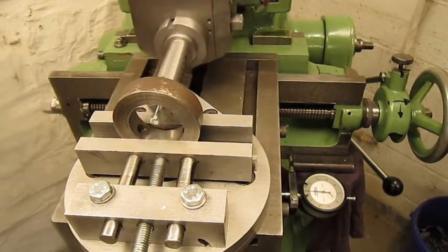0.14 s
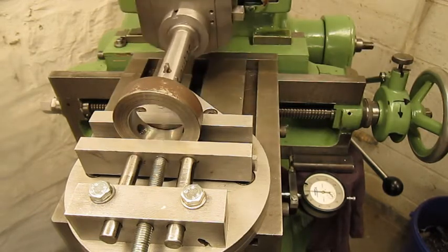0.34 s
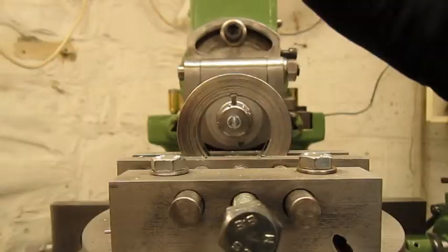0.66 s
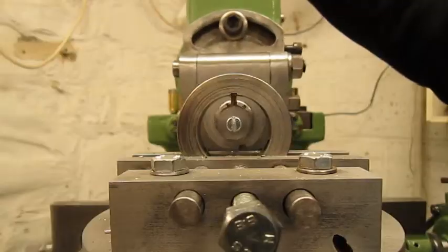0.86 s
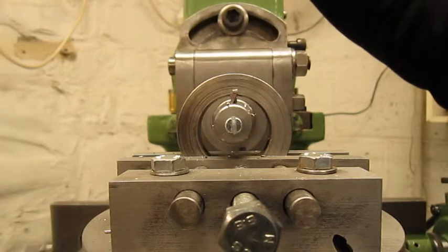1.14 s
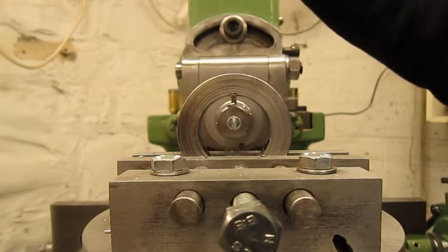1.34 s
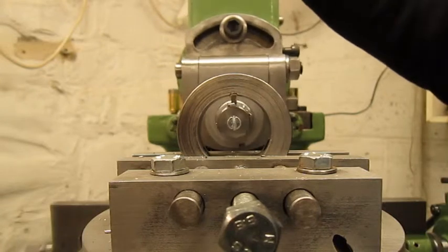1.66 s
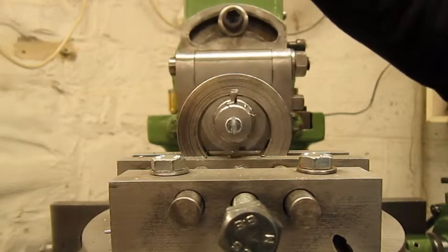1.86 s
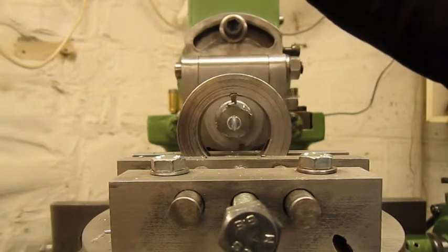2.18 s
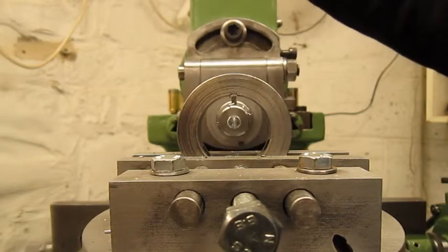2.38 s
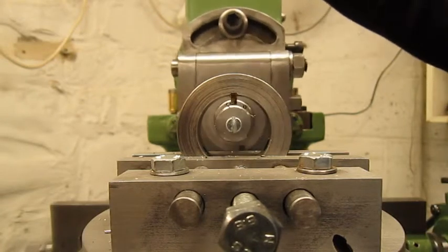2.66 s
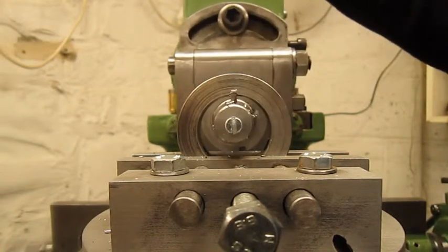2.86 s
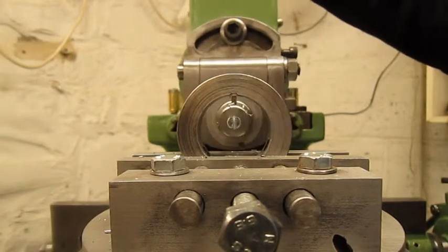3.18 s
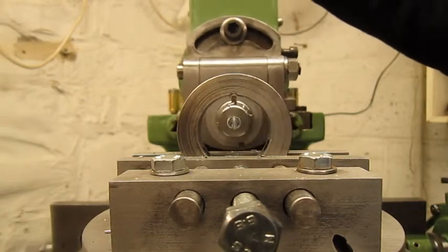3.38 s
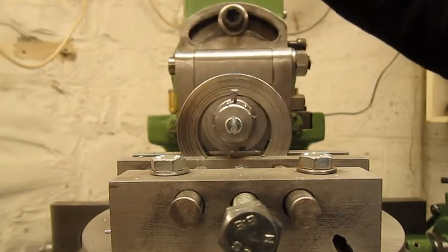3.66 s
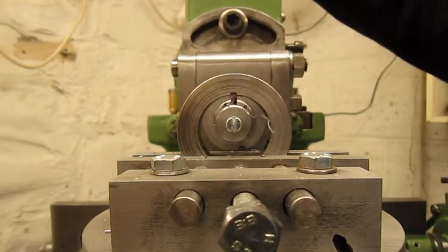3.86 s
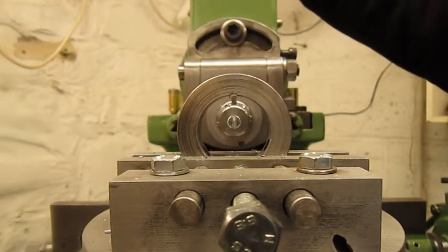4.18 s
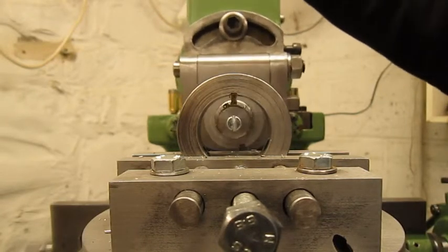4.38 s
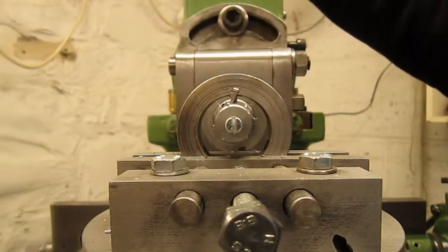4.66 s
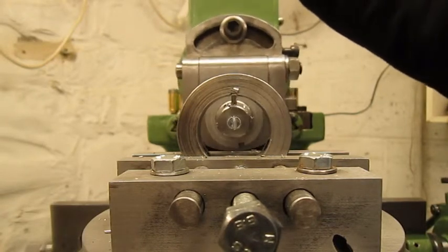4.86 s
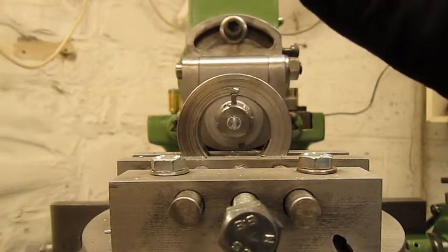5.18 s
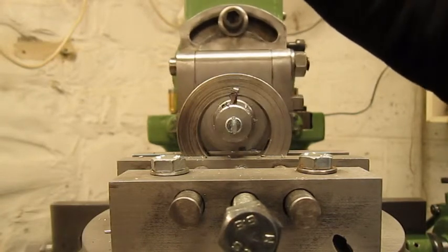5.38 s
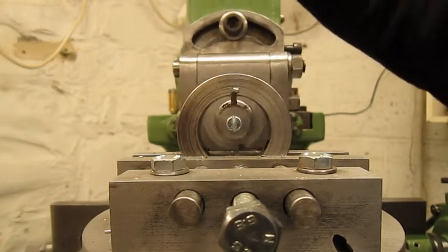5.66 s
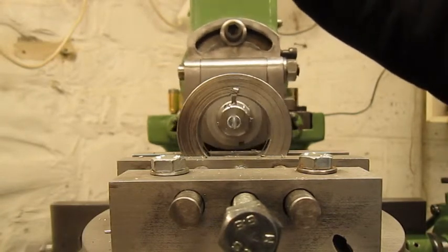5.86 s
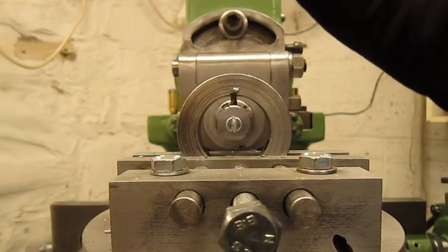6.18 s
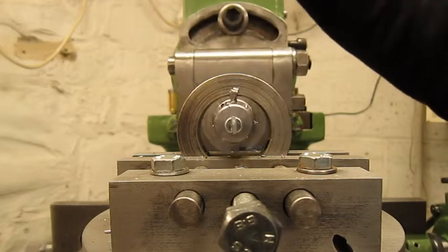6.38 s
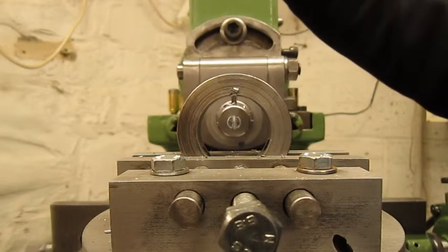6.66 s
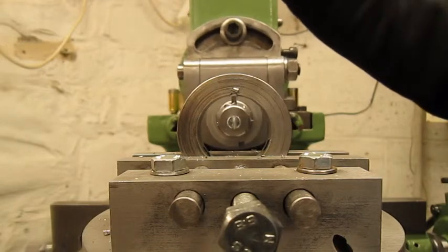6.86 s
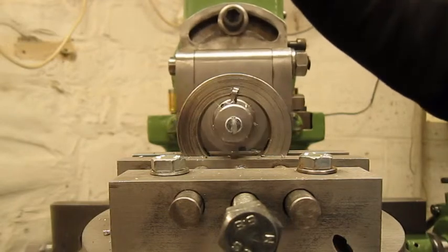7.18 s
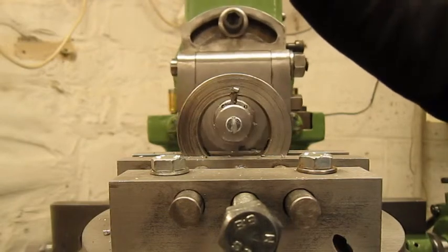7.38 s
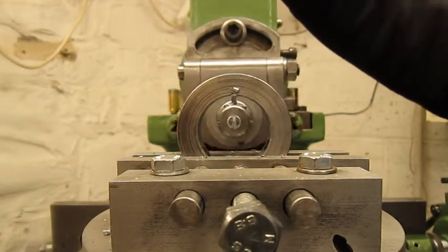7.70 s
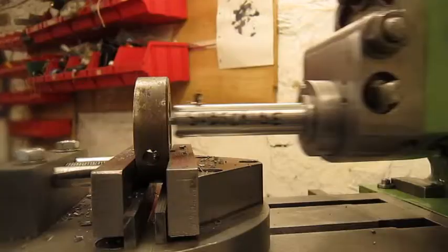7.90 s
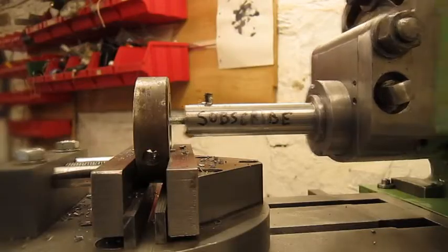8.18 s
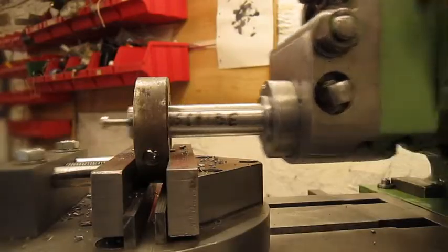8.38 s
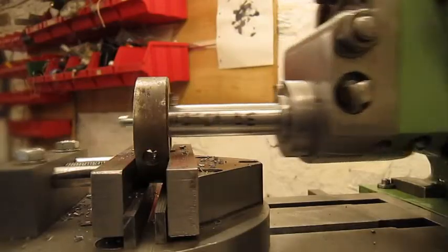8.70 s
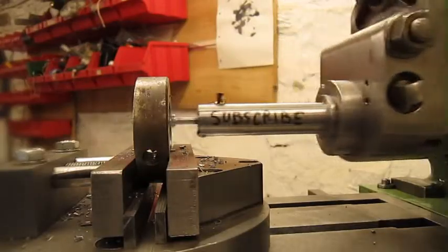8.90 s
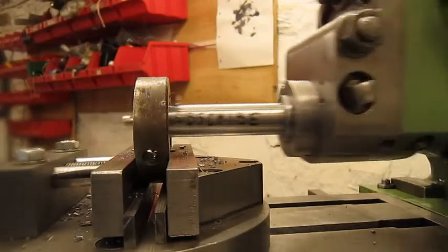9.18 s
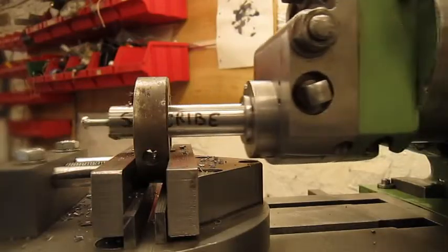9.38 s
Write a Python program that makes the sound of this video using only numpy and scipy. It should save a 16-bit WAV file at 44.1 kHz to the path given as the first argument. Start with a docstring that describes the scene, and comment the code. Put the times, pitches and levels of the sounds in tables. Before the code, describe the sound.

A dull clunk opens as the drone of a metal shaping machine rises at once, a low motor and gear hum with a light sliding hiss, swelling and sinking with every turn. A faint first cut comes right at the start, and two thin ticks follow around 0.5 seconds. From about 0.9 seconds the tool cuts steel evenly, roughly every 0.87 seconds: a sharp knock, a brief gritty crunch and a snap that leaves a short metallic ring. About 0.4 seconds after each knock, a quieter return scrape ends in a tiny high ping. The cuts are strongest between 3.5 and 6.3 seconds, some with extra snags. At 7.9 seconds a dry click interrupts a cut and the drone becomes slightly fuller. Softer cuts follow at 8.3 and 9.2 seconds, with a dull clunk near 9.4. The sound is close, in a small workshop with little echo.

```python
"""A dull clunk and a rising drone of motor and gears: a small metal shaper slots a steel ring in a workshop.
On each stroke the tool knocks into the work, shears a chip and snaps free, exciting the ring's resonances,
then drags back through the slot and drops onto its seat with a ping. The drone, coloured by the cast
frame, swells and sinks with every turn of the crank, and a limiter ducks it after each loud knock.
It is heard close up from the front and, at the start and end, from the side; thin ticks mark the moves."""
import sys
import numpy as np
from scipy import signal
from scipy.fft import rfft, irfft, next_fast_len
from scipy.io import wavfile
from scipy.ndimage import uniform_filter1d

SR = 44100
rng = np.random.default_rng(int(sys.argv[2]) if len(sys.argv) > 2 else 0)


def unload_wav(signal):
    """Save mono or channel-first audio to the path in sys.argv[1] as 16-bit WAV at rate SR, clipped to [-1, 1]."""
    wavfile.write(
        sys.argv[1],
        SR,
        np.round(np.clip(np.atleast_2d(signal).T, -1, 1) * 32767).astype(np.int16),
    )


N = 420713
T = np.arange(N) / SR
FFT_SIZE = 2 * next_fast_len(N // 2 + SR // 2)
HZ = np.maximum(np.arange(FFT_SIZE // 2 + 1) * SR / FFT_SIZE, 1)
FRONT_VIEW_S = (0.572, 7.932)
FROM_SIDE = (T < FRONT_VIEW_S[0]) | (T > FRONT_VIEW_S[1])


# cutting strokes: entry_s, length_s, knock_db, bite_db, chip_db, chip_rise_db, break_db, after_ring_db
STROKES = [(0.023, 0.099, -40, -50, -25.5, 2, -43, -34), (0.8783, 0.13, -6.5, -18, -21.5, 2, -19, -28.5),
           (1.758, 0.129, -8.5, -20.5, -27, 5, -18.5, -28.5),
           (2.6397, 0.13, -13, -21.5, -20, 2, -17.5, -27.5),
           (3.5207, 0.12, -6.5, -17, -14, -2.5, -14, -28.5),
           (4.3996, 0.13, -24, -19, -17.5, 1, -22.5, -30.5),
           (5.281, 0.12, -14.5, -14.5, -13.5, 0, -12, -34), (6.161, 0.12, -3.5, -13, -14, -1.5, -18, -28),
           (7.042, 0.13, -17, -24, -21.5, 5, -13.5, -36),
           (7.9225, 0.043, -17, -28.5, -20.5, -4.5, -23.5, -50),
           (8.323, 0.12, -14, -42, -25.5, -4.5, -30.5, -39), (9.2034, 0.125, -20, -47, -28, -5.5, -43, -41)]
# force spectra at the tool tip: frequency_hz, relative_db
FRONT_KNOCK_SPECTRUM = [(40, -6), (300, 1.5), (1000, 0.5), (1400, 11), (2000, 4), (3300, 5.5), (4300, -7),
                        (6500, -5)]
SIDE_KNOCK_SPECTRUM = [(300, -24), (2200, -13), (3200, -1), (4100, -4), (5000, -8), (6300, -2), (8000, 2.5)]
BITE_SPECTRUM = [(300, -10.5), (1400, -5), (2500, -2), (3700, 1.5), (4800, -7), (6500, -5)]
CHIP_SPECTRUM = [(30, -15.5), (85, 5), (280, 7.5), (500, 5.5), (1000, 0.5), (1900, -2.5), (3100, -8.5),
                 (4200, -19.5), (5600, -23), (6500, -11)]
BREAK_SPECTRUM = [(100, -9.5), (900, 0.5), (2000, -5), (4000, -10), (6500, -13)]
# resonances of the boring bar as the chip tears free: centre_hz, width_hz, lift_db
BAR_RESONANCES = [(1410, 200, 4.5), (2350, 250, 4), (3200, 240, 12.5), (4980, 100, 10)]

def cutting(work, knock_s=0.0035, release_s=0.0026, judder_db=1.56, bite_s=0.076, break_s=0.0073):
    """Impact and fracture: the tool knocks and bites; the chip shears in tiny slips and tears free."""
    blow, bite, push, tear = np.zeros((4, N))
    for entry_s, length_s, knock_db, bite_db, chip_db, rise_db, break_db, _ in STROKES:
        age = T - entry_s
        impact = np.interp(age, [0, knock_s / 10, knock_s, 2 * knock_s], [0, from_db(3), 1, 0])
        blow += from_db(knock_db) * impact
        bite += from_db(bite_db) * np.exp(-np.abs(age) / bite_s) * (age > 0) * (age < length_s)
        push += np.interp(age, [0, knock_s, length_s, length_s + release_s],
                          [0, from_db(chip_db), from_db(chip_db + rise_db), 0])
        snap = np.interp(age - length_s, [-break_s, -break_s / 2, 0, release_s / 2], [0, 1, 1, 0])
        tear += from_db(break_db) * snap
    fractures = slips(per_s=5000, spread_db=0.5) * from_db(judder_db * drift(220))
    shear = excite(fractures, push, CHIP_SPECTRUM, work)
    crunch = excite(slips(per_s=5000, spread_db=2.0), bite, BITE_SPECTRUM, work)
    grit = rng.choice([-1., 1.], N)
    knock = np.where(FROM_SIDE, excite(grit, blow, SIDE_KNOCK_SPECTRUM),
                     excite(grit, blow, FRONT_KNOCK_SPECTRUM))
    break_off = excite(grit, tear, BREAK_SPECTRUM, resonant_body(BAR_RESONANCES))
    return shear + crunch + knock + break_off


# return strokes: exit_s, level_db
RETURNS = [(0.571, -34), (1.293, -27), (2.174, -27.5), (3.056, -28.5), (3.936, -27.5), (4.816, -25),
           (5.697, -31), (6.579, -32), (7.457, -30), (8.725, -29.5), (9.61, -29)]
# friction force spectrum: frequency_hz, relative_db
DRAG_SPECTRUM = [(100, -25.5), (700, -6.5), (1250, -1.5), (2000, -5), (2600, -4.5), (3600, -15.5),
                 (4800, -20), (6500, -15.5)]

def dragging(work, length_s=0.14, grip_s=0.078, swell_db_per_s=49, fade_s=0.0044):
    """Sliding friction: the returning tip grips and scrapes ever harder until it drops off the edge."""
    force = np.zeros(N)
    for exit_s, db in RETURNS:
        left_s = np.clip(exit_s - T, 0, length_s)
        contact = np.minimum((length_s - left_s) / grip_s, 1) * (T < exit_s)
        force += contact * from_db(db - swell_db_per_s * left_s)
    force = uniform_filter1d(force, int(fade_s * SR) + 1)
    return excite(slips(per_s=7000, spread_db=1.5), force, DRAG_SPECTRUM, work)


# snags of the tip within a cut or a drag: start_s, level_db
SNAGS = [(1.258, -31.5), (2.16, -24.5), (2.739, -16), (3.0173, -24), (3.547, -2), (3.625, -16),
         (4.745, -24.5), (4.775, -23), (5.3445, -18.5), (5.366, -16), (6.535, -29), (6.558, -22),
         (8.685, -22.5), (8.714, -29)]
# their force spectrum: frequency_hz, relative_db
SNAG_SPECTRUM = [(300, -11.5), (1300, 2), (3000, -3.5), (4500, -11), (6500, -10.5)]

def snagging(work, decay_s=0.004):
    """Transient excitation: each snag is a decaying burst of fractures that rings the work."""
    force = signal.lfilter([1], [1, -np.exp(-1 / (decay_s * SR))], impulses(SNAGS) + 1e-18)
    return excite(rng.choice([-1., 1.], N), force, SNAG_SPECTRUM, work)


# resonances of ring, vice and boring bar: centre_hz, width_hz, lift_db
WORK_RESONANCES = [(1250, 5.5, 4.5), (1305, 4.3, 8), (1362, 15, 17), (1397.5, 12, 5.5), (1436, 24, 6),
                   (1605, 31, 8), (1834, 21, 4.5), (1910, 22, 10.5), (1994, 34, 9), (2048, 18, 9.5),
                   (2216, 16, 14.5), (2310, 25, 5.5), (2362, 32, 9.5), (2576, 37, 8), (2935, 21, 8.5),
                   (3027, 36, 9), (3132, 28, 9), (3176, 44, 8), (3390, 56, 5.5), (3620, 55, 5.5),
                   (3680, 49, 8), (4430, 590, 6), (4920, 73, 5), (5150, 130, 5.5), (5440, 80, 4)]

def tool_on_work():
    """Source and filter: cut, drag and snag all drive the same resonant steel."""
    work = resonant_body(WORK_RESONANCES)
    return cutting(work) + dragging(work) + snagging(work)


# modes of the steel ring: pitch_hz, level_db, t60_s
RING_MODES = [(2205, 0.5, 0.38), (2232, -6, 0.25), (2150, -10, .25), (2400, -10.5, .16), (1330, -7.5, .25),
              (1290, -12, .3), (3100, -12, 0.22)]

def after_ring(below_drag_db=11.5):
    """Free vibration: the ring sounds on whenever the tool lets go of it."""
    after_cuts = [(entry_s + length_s, db) for entry_s, length_s, *_, db in STROKES]
    after_drags = [(exit_s, db - below_drag_db) for exit_s, db in RETURNS if exit_s < T[-1]]
    return strike(after_cuts + after_drags, RING_MODES)


# drops of the tool holder: start_s, relative_db
SEATINGS = [(1.291, -36), (2.1725, -37.5), (3.0555, -31.5), (3.937, -33), (4.4109, -23.5), (4.552, -39.5),
            (4.8165, -36), (5.697, -36), (6.5788, -35.5), (7.4586, -31.5)]
# its modes: pitch_hz, level_db, t60_s
HOLDER_MODES = [(4022, 0, 0.1), (3994, -1.5, 0.085), (4160, -15, .04), (3930, -10, .02), (4611, -13, 0.012),
                (5600, 1, .005), (3100, -13, .005)]

def holder_pings():
    """Impact excitation: the holder drops onto its seat and its high modes ring briefly."""
    return from_db(1.5) * strike(SEATINGS, HOLDER_MODES)


# rolling noise of belt and gears: frequency_hz, relative_db
ROLLING_SPECTRUM = [(25, -95), (64, -83.5), (84, -57.5), (190, -62), (280, -62.5), (365, -66.5),
                    (450, -61.5), (570, -65), (780, -70.5), (1020, -71.5), (1200, -82.5), (1800, -88),
                    (6000, -94)]
# resonances of the cast frame: centre_hz, width_hz, front_lift_db, side_lift_db
FRAME_RESONANCES = [(126, 11, 9.5, 9), (167, 2, 10.5, -4), (248.9, 13.4, 16.5, 16.5), (304.8, 21, 6, 11.5),
                    (325.4, 11, 13, 8), (388.5, 9, 9.5, 3), (477, 19, 6.5, 7), (516.2, 14, 11, 8),
                    (603, 14, 6, 2), (741, 13, 8.5, 5.5), (901.5, 26, 14, 14), (999.5, 9, 11.5, 9)]
# motor and gear tones: pitch_hz, front_db, side_db
DRIVE_TONES = [(96, -52, -55), (123.8, -40.5, -41.5), (164.1, -39.5, -36.5), (244.3, -29.5, -28),
               (306.7, -40, -46), (327.1, -32.5, -37), (433.6, -45, -39.5), (490.5, -54, -36.5),
               (513.3, -42.5, -33), (612, -52, -46.5), (888, -46.5, -40.5), (1007, -56.5, -57)]

def drone(view, load_db, waver, wander_rad, motor_hz=24.82, throb=0.2, load_share=0.28):
    """Forced vibration: rolling noise drives the frame; tones grow with load and waver with belt slip."""
    column = ("front", "side").index(view)
    frame = resonant_body([(hz, width_hz, db[column]) for hz, width_hz, *db in FRAME_RESONANCES])
    rolling = white() * (1 + throb * np.sin(2 * np.pi * motor_hz * T))
    out = colour(rolling, ROLLING_SPECTRUM, frame)
    strain = from_db(load_share * load_db)
    for hz, *db in DRIVE_TONES:
        phase = 2 * np.pi * (hz * T + rng.random()) + wander_rad * drift(12)
        out += from_db(db[column]) * strain * (1 + waver * drift(14)) * np.sin(phase)
    return out


# load through one turn of the crank: since_entry_s, hum_db, growl_db, whirr_db, slideway_db
LOAD_CYCLE = [(0, -27, -39.5, -48.5, -1), (0.079, -30.5, -38, -37, 6), (0.29, -31.5, -37, -40.5, 1),
              (0.38, -28.5, -38.5, -37.5, 1), (0.45, -30, -39.5, -41, 2), (0.53, -27.5, -37.5, -36, 0.5),
              (0.62, -33, -38, -39.5, 0.5), (0.73, -28, -33, -36.5, 1), (0.79, -26, -34.5, -36, 1.5),
              (0.86, -22.8, -36.5, -35, 3)]
# effort of the drive, one row a stroke:
# drone_db, lull_depth_db, growl_surge_db, hum_surge_db, bass_over_hum_db, bass_lull_db, bass_surge_db
EFFORTS = [(1, 1, 25, -5, -6.5, -4, -4), (1.5, 11, -2, -1.5, -9.5, 3, -1.5), (-1, 7.5, -1, -2, -8.5, 1, 3),
           (-1, 8.5, 1.5, 1, -6, 5, 3.5), (-1, 5, 2.5, -2, -7.5, 1, 1.5),
           (3, 10.5, 2, -1.5, -7.5, -0.5, 5.5), (-1, 4, -4, -1.5, -6, 3, -1), (-0.5, 8, 5.5, 0, -7.5, 2, 3),
           (-1.1, 5.5, 1.5, -1, -7.5, -1, 2), (1, -4, 1, -0.5, -6.5, -4, 1),
           (-1, 2.5, -3, -1, -8, -1.5, -2), (0, 4, 0.5, 1.5, -9, -7, 0)]

def drive_levels(lull_at_s=0.23, lull_width_s=0.077, surge_lead_s=0.1, surge_width_s=0.12):
    """Cyclic loading: band levels in dB surge or dip before each cut and shift as the ram turns round."""
    drone_db, lull_db, growl_surge_db, hum_surge_db, bass_db, bass_lull_db, bass_surge_db = (
        np.transpose(EFFORTS))
    current, coming, ahead_s, turn_s = crank()
    lull = np.exp(-((turn_s - lull_at_s) / lull_width_s) ** 2)
    surge = np.exp(-((ahead_s - surge_lead_s) / surge_width_s) ** 2)
    cycle_s, *curves, _ = np.transpose(LOAD_CYCLE)
    hum, growl, whirr = (np.interp(turn_s, cycle_s, curve) + drone_db[current] for curve in curves)
    sag_db = lull * lull_db[current]
    upper_sag_db = 0.2 * sag_db
    return (hum + bass_db[current] + surge * bass_surge_db[coming] - lull * bass_lull_db[current],
            hum + surge * hum_surge_db[coming] - sag_db,
            growl + surge * growl_surge_db[coming] - upper_sag_db,
            whirr - upper_sag_db)


def drive(crossovers_hz=(195, 370, 650), side_lifts_db=(1.5, 2.5, 6.5, 3), uneven_belt_db=1.0):
    """Amplitude modulation: the drone's bass, hum, growl and whirr each follow the load on the crank."""
    levels_db = drive_levels()
    load_db = levels_db[1] - np.median(levels_db[1])   # the swell of the hum
    front = drone("front", load_db, waver=0.27, wander_rad=0.46)
    side = drone("side", load_db, waver=0.26, wander_rad=0.33)
    sound = np.where(FROM_SIDE, side, front)
    bass, low, low_mid = (signal.sosfiltfilt(signal.butter(4, hz, fs=SR, output="sos"), sound)
                          for hz in crossovers_hz)
    bands = bass, low - bass, low_mid - low, sound - low_mid
    out = 0
    for band, level_db, side_db in zip(bands, levels_db, side_lifts_db):
        steady = band / np.sqrt(uniform_filter1d(band ** 2, size=SR // 10))
        out += steady * from_db(level_db + side_db * FROM_SIDE + uneven_belt_db * drift(16))
    onset_db = -21 * np.maximum(1 - T / 0.065, 0)
    return out * from_db(onset_db)


def crank(period_s=0.8685):
    """Periodic motion: the latest stroke, the coming one, the time until it and the time into the turn."""
    entries_s = np.array(STROKES)[:, 0]
    begun = np.searchsorted(entries_s, T)
    current, coming = np.maximum(begun - 1, 0), np.minimum(begun, len(entries_s) - 1)
    ahead_s = entries_s[coming] - T
    return current, coming, ahead_s, -ahead_s % period_s


# hiss of the slideways: frequency_hz, level_db
SLIDE_SPECTRUM = [(500, -89), (1100, -79.5), (1500, -80.5), (2100, -81), (3000, -87.5), (4000, -90),
                  (5000, -93.5), (6400, -100)]
# resonances rubbed by the ram: centre_hz, width_hz, level_db
SLIDE_RESONANCES = [(1304, 50, -70.5), (1436, 30, -75), (1633, 30, -73), (1775, 18, -70), (1934, 35, -75.5),
                    (2360, 37, -79.5), (2460, 38, -80.5), (2840, 68, -87), (3136, 77, -83),
                    (3402, 36, -80.5), (3900, 190, -87)]

def slideways(swell_db=4, flutter_db=1.0, side_db=0.5):
    """Friction noise: the ram rubs along its guides, and each resonance swells and fades on its own."""
    out = colour(white(), SLIDE_SPECTRUM)
    for hz, width_hz, db in SLIDE_RESONANCES:
        gain = from_db(db + swell_db * drift(9.2))
        out += gain * signal.lfilter(*signal.iirpeak(hz, hz / width_hz, fs=SR), white())
    cycle_s, *_, rub_db = np.transpose(LOAD_CYCLE)
    *_, turn_s = crank()
    return out * from_db(np.interp(turn_s, cycle_s, rub_db) - flutter_db * drift(28) + side_db * FROM_SIDE)


# clunks in the drive: start_s, level_db
CLUNKS = [(0.012, -27.5), (6.918, -27), (9.444, -22.5)]
# modes of the casting: pitch_hz, level_db, t60_s
CASTING_MODES = [(500, -2, 0.078), (720, -2, 0.089), (901, -1.5, 0.17), (1068, -12.5, 0.14),
                 (2570, -15, .06)]

def clunks():
    """Backlash: play in the drive knocks the casting's damped modes."""
    return strike(CLUNKS, CASTING_MODES)


# thin ticks, most near a change of viewpoint: start_s, level_db
TICKS = [(0.5315, -28), (0.5714, -29), (7.9317, -22), (7.9715, -36), (8.3262, -34)]
# their spectrum: frequency_hz, gain_db
TICK_SPECTRUM = [(1000, 7), (6000, 5), (10000, 0.5), (15000, -3)]

def ticks():
    """An impulse is broadband: single dry clicks reach far into the treble."""
    return colour(impulses(TICKS), TICK_SPECTRUM)


def workshop(x, t60_s=0.22, tail_db=-11.5, delay_s=0.006):
    """Reverberation: the brick walls add a short, diffuse, exponentially decaying tail."""
    t = T[:SR // 2]
    tail = rng.standard_normal(len(t)) * from_db(-60 * t / t60_s) * (t > delay_s)
    return x + from_db(tail_db) * signal.fftconvolve(x, tail / np.linalg.norm(tail))[:N]


def from_db(db):
    """Decibels to amplitude ratio."""
    return 10 ** (np.asarray(db) / 20)


def white():
    """White noise of 0 dB per Hz."""
    return rng.standard_normal(N) * np.sqrt(SR / 2)


def drift(per_s):
    """Random modulation of unit rms, gliding between `per_s` new values a second."""
    curve = np.interp(T * per_s, np.arange(4096), rng.standard_normal(4096))
    return curve / np.sqrt(np.mean(curve ** 2))


def slips(per_s, spread_db):
    """Shot noise: tiny fractures of uneven size at random moments."""
    signs = (rng.random(N) < per_s / SR) * rng.choice([-1, 1], N)
    return signs * from_db(spread_db * np.clip(rng.standard_normal(N), -2, 2))


def impulses(hits):
    """Ideal impacts: one sample for each (start_s, level_db)."""
    out = np.zeros(N)
    for start_s, db in hits:
        out[int(start_s * SR)] = from_db(db)
    return out


def strike(hits, modes):
    """Modal superposition: each hit starts every mode as a damped sinusoid."""
    clicks, out = impulses(hits) + 1e-18, 0
    for hz, db, t60_s in modes:
        decay, step = from_db(-60 / (t60_s * SR)), 2 * np.pi * hz / SR
        feedback = [1, -2 * decay * np.cos(step), decay ** 2]
        out += signal.lfilter([0, from_db(db) * np.sin(step)], feedback, clicks)
    return out


def resonant_body(resonances):
    """Peaking resonances in series: their frequency responses multiply."""
    response = 1
    for hz, width_hz, lift_db in resonances:
        detuning = (HZ ** 2 - hz ** 2) / (HZ * width_hz)
        response *= 1 + (from_db(lift_db) - 1) / (1 + 1j * detuning)
    return response


def colour(x, spectrum, body=1):
    """Minimum-phase filtering by this spectrum, followed by a body's response."""
    hz, db = np.transpose(spectrum)
    cepstrum = irfft(np.log(from_db(np.interp(np.log(HZ), np.log(hz), db))))
    cepstrum[1:FFT_SIZE // 2] *= 2   # folding onto positive time makes the filter causal
    cepstrum[FFT_SIZE // 2 + 1:] = 0
    return irfft(rfft(x, FFT_SIZE) * np.exp(rfft(cepstrum)) * body)[:N]


def excite(grains, force, spectrum, body=1):
    """Forced response of a body to grains under a changing force; a steady force of 1 gives rms 1."""
    return colour(grains * force, spectrum, body) / np.std(colour(grains, spectrum, body))


def scene():
    """Superposition: drive and slideways run throughout; the tool's sounds reverberate in the room."""
    machine = drive() + slideways() + clunks()
    tool = tool_on_work() + after_ring() + holder_pings()
    return (machine + workshop(tool))[None]


def limiter(x, ceiling_db=-14.0, release_db_per_s=55, attack_s=0.00027, sense_hz=450):
    """Peak limiting: peaks above the bass that pass the ceiling cut the gain; it climbs back steadily."""
    sensed = signal.sosfilt(signal.butter(1, sense_hz, "high", fs=SR, output="sos"), x)
    over_db = np.maximum(20 * np.log10(np.abs(sensed) + 1e-9) - ceiling_db, 0)
    recovery_db = release_db_per_s * T[:x.shape[-1]]
    held_db = np.maximum.accumulate(over_db + recovery_db, axis=-1) - recovery_db
    pole = np.exp(-1 / (attack_s * SR))
    return x * from_db(-signal.lfilter([1 - pole], [1, -pole], held_db))


def treble_cut(x, stop_hz):
    """Band limiting: a steep low-pass, 60 dB down from stop_hz."""
    return signal.sosfilt(signal.cheby2(12, 60, stop_hz, fs=SR, output="sos"), x)


# the recorder's own hiss: frequency_hz, density_db_per_hz
HISS_SPECTRUM = [(30, -82), (1000, -81.5), (4000, -96.5), (6500, -99)]

def record(dry, saturation=0.18):
    """Each viewpoint is limited alone; soft clipping, hiss and a treble cut follow, then the ticks."""
    views = np.split(dry, [int(s * SR) for s in FRONT_VIEW_S], axis=-1)
    limited = np.concatenate([limiter(view) for view in views], axis=-1)
    rounded = saturation * np.tanh(limited / saturation)
    dulled = treble_cut(rounded + colour(white(), HISS_SPECTRUM), stop_hz=7000)
    fade_out = np.minimum((T[-1] - T) / 0.003, 1)
    return treble_cut(dulled * fade_out + ticks(), stop_hz=16000)


dry = scene()
out = record(dry)
unload_wav(out)
```